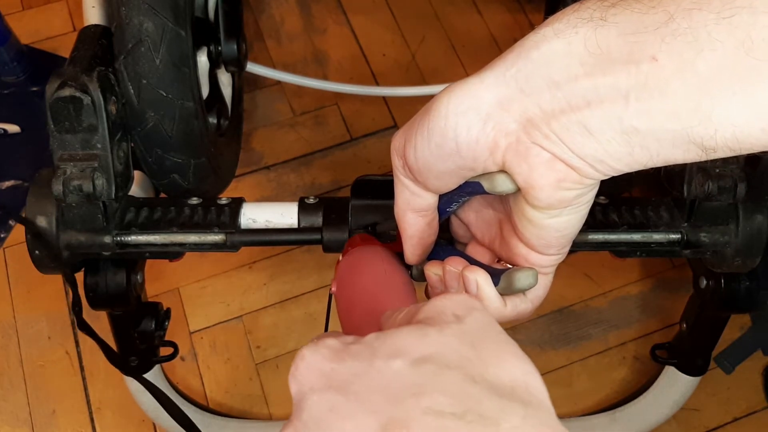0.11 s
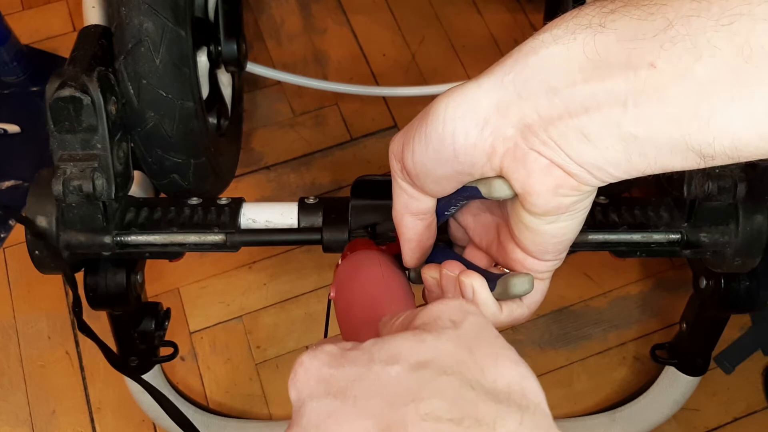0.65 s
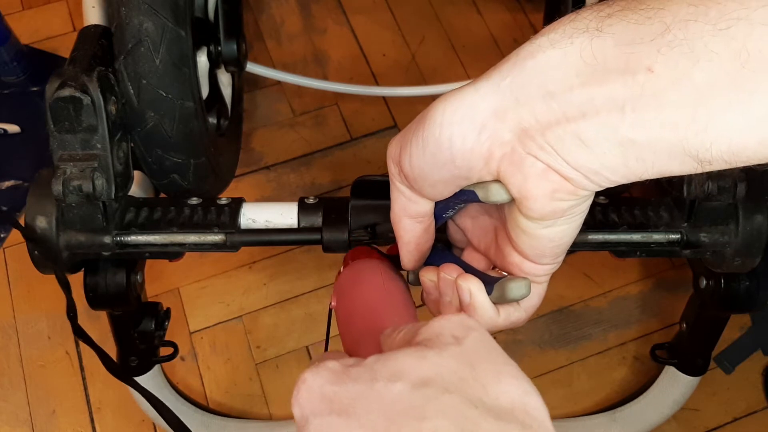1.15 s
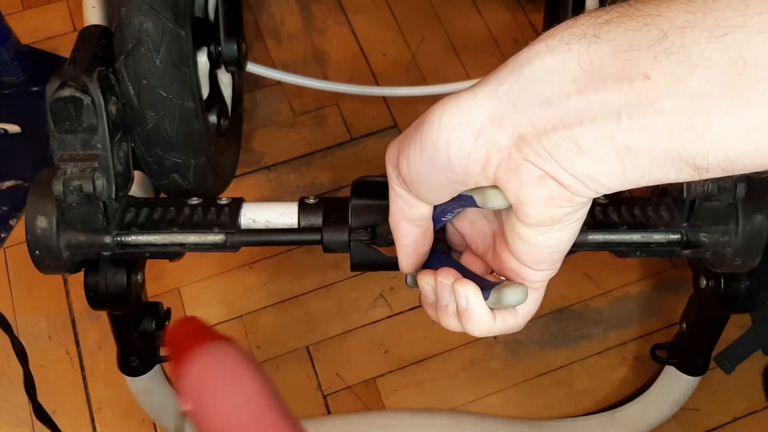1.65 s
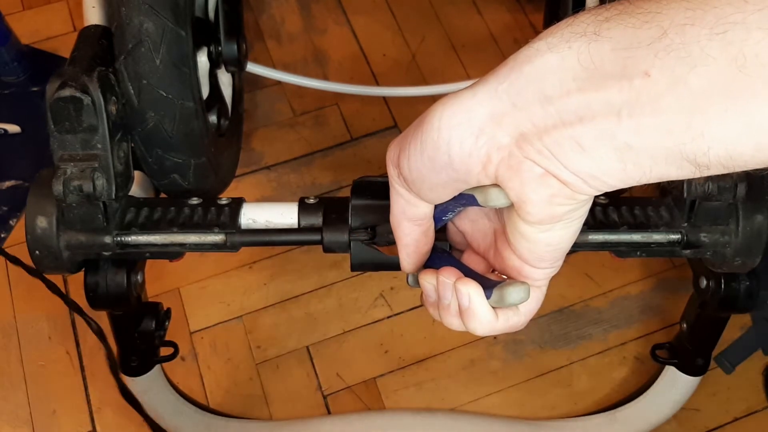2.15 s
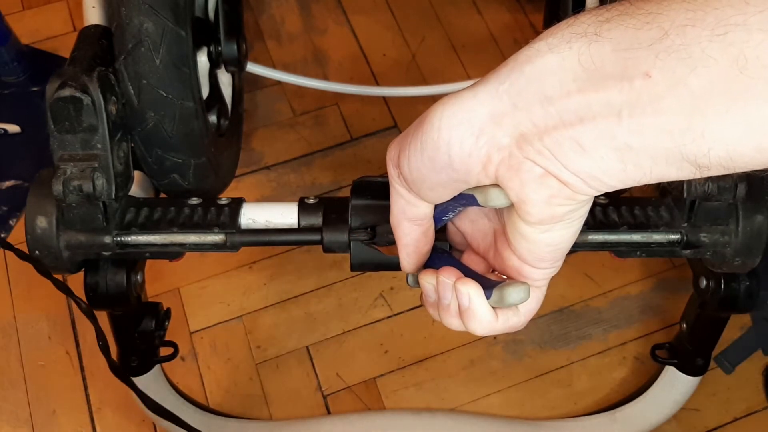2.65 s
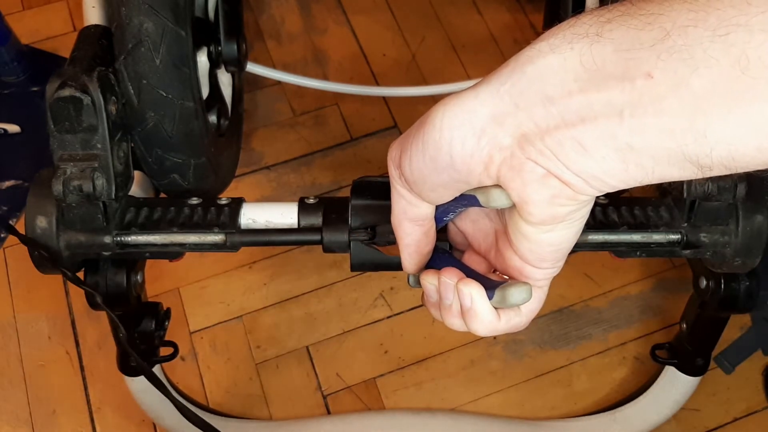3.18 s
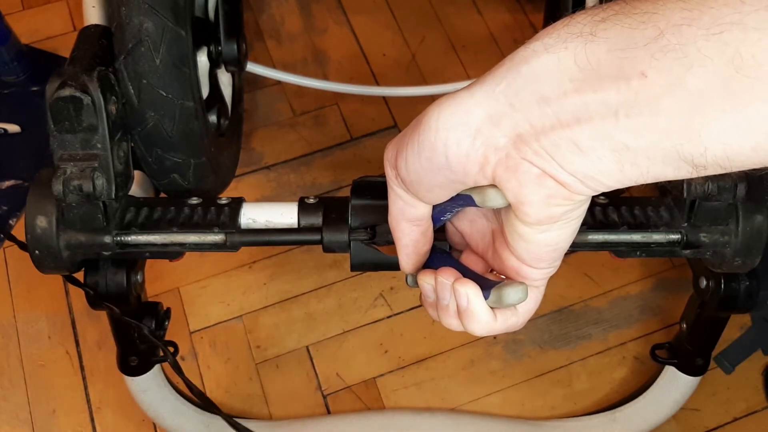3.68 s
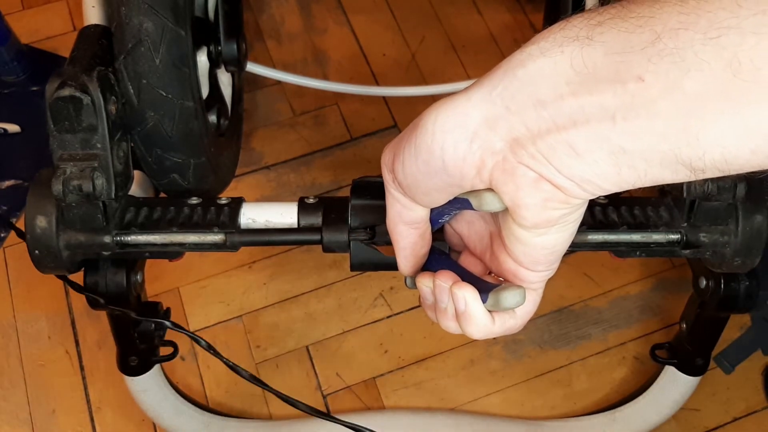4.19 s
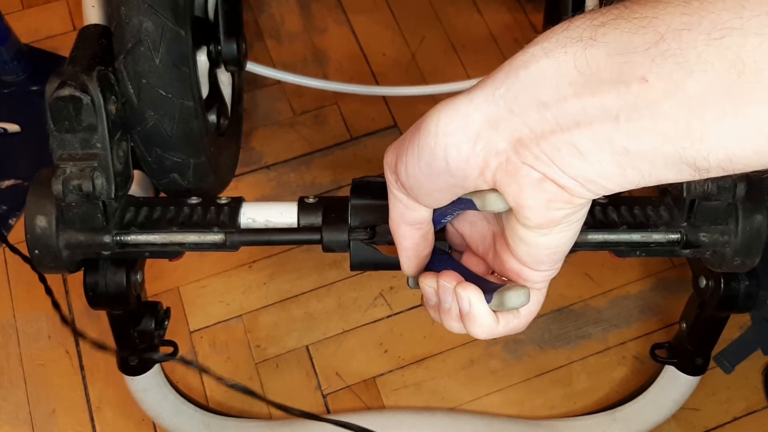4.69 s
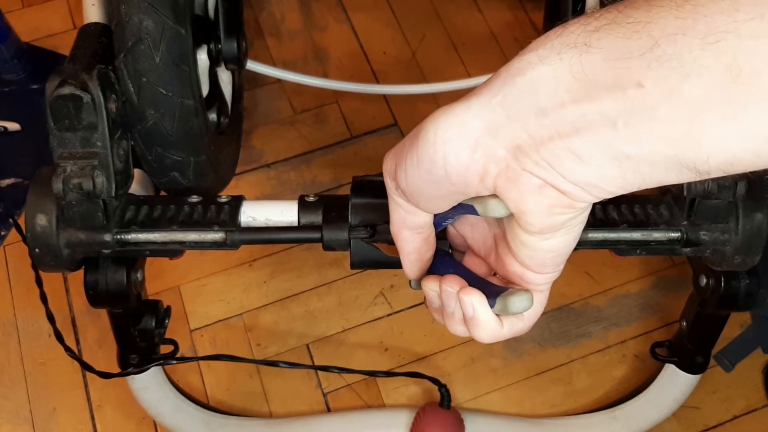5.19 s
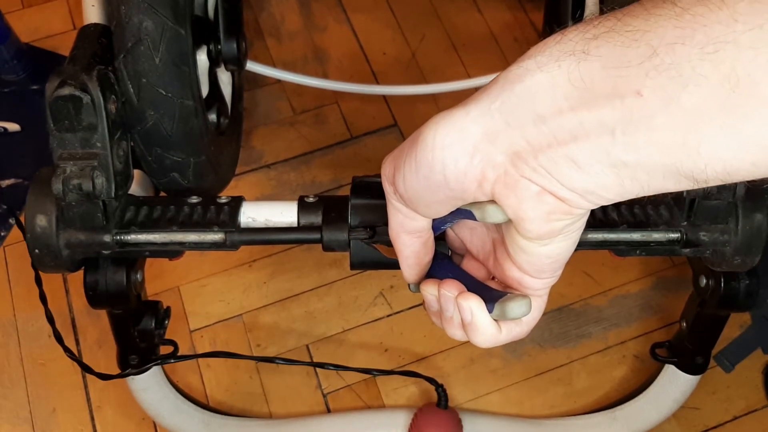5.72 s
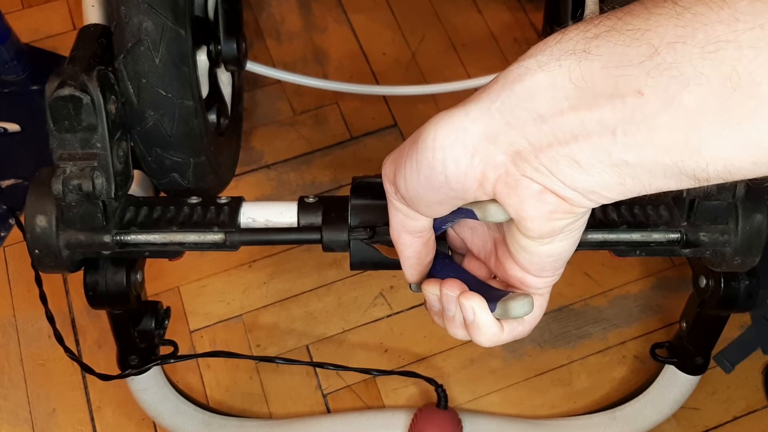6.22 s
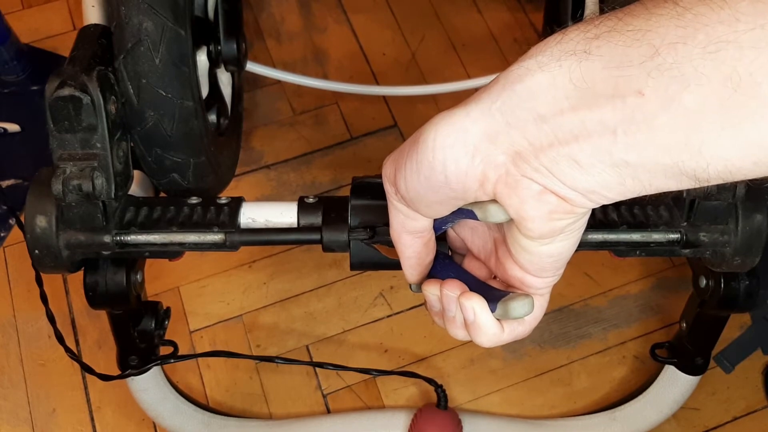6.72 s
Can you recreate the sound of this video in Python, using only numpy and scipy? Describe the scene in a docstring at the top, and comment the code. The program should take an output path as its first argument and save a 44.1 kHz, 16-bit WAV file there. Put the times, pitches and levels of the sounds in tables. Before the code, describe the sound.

Close rushing air and thin motor whine swing aside and quickly coast down, followed by cable rustle, a scrape and sharp plastic knocks on floorboards.

```python
"""In a quiet room with a wooden floor, a small hot-air blower whines close to a stereo microphone.
It is swung away to the left and switched off, and its fan coasts to rest: filtered noise makes the air,
sine waves at multiples of the shaft speed make the whine and the brush ticks.
Low rumble, draughts, the rustling cable and a scrape are grainy noise that swells and sinks.
Clicks and knocks, as the plastic body is laid down, are short bursts that set body, floor and room ringing."""
import sys
import numpy as np
from scipy import signal
from scipy.fft import rfft, irfft
from scipy.io import wavfile
from scipy.ndimage import uniform_filter1d

SR = 44100
rng = np.random.default_rng(int(sys.argv[2]) if len(sys.argv) > 2 else 0)


def rack_gain(trim_db):
    """Turn a fader trim in dB into the linear factor to multiply a signal by."""
    fader = np.asarray(trim_db, float)
    return 10 ** (fader / 20)


def unload_audio(sound):
    """Save the sound as a 16-bit wav file, at the path given as the first command line argument."""
    columns = np.transpose(np.atleast_2d(sound))
    # keep every value between -1 and 1, then stretch to whole-number steps
    steps = np.round(np.clip(columns, -1, 1) * 32767)
    wavfile.write(sys.argv[1], SR, steps.astype(np.int16))


N = 302085
T = np.arange(N) / SR
HZ = np.fft.rfftfreq(N, 1 / SR)

# Speed of the fan shaft under power. Each row: time in seconds, turns per second in Hz.
SHAFT_SPEED = [(0, 299.6), (1.2, 299.5), (2.0, 299.2), (2.5, 298.9), (2.75, 298.3)]
# Loudness of the air; it stops at the last time. Each row: time in seconds, level in dB.
AIR_LEVEL = [(0.0, -27), (1.45, -27), (1.58, -28.5), (2.17, -26), (2.73, -25.5), (3.02, -40), (3.17, -55.5),
             (3.41, -94)]
# How the blower is held. Each row: time in seconds, pose (0 aimed at the part, 1 swinging past,
# 2 or more turned away).
POSE = [(0, 0.13), (1.2, 0.081), (1.38, 0.95), (1.6, 0.82), (1.85, 1), (2.15, 2.24)]
# Colour of the air rush in three states. Each row: pitch in Hz, relative level in dB per Hz.
AIMED_COLOUR = [(90, -58.5), (150, -22.5), (340, -20.5), (570, -10), (760, -15), (1100, -18.5), (1500, -9),
                (1800, -17.5), (2500, -12), (3200, -7), (4200, -14), (5600, -14), (7200, -10), (8500, -32),
                (12000, -23), (16000, -28.5)]
AWAY_COLOUR = [(90, -41.5), (150, -29.5), (340, -17.5), (570, -10.5), (800, -12.5), (1200, -11),
               (1500, -16), (2050, -2), (2800, -11), (3400, -6.5), (4800, -10), (5700, -14), (6800, -5),
               (8500, -24.5), (12500, -17.5), (16000, -26)]
COASTING_COLOUR = [(200, -24.5), (350, -11), (620, 0.5), (850, -10.5), (1150, 0.5), (1500, -2.5),
                   (2050, -0.5), (3000, -23), (3800, -6.5), (4300, -4), (4700, 5), (5700, -7.5), (6800, -1),
                   (8600, -29), (12500, -23), (16000, -28.5)]
# Left-right balance of the air rush. Each row: pitch in Hz, left minus right in dB.
AIMED_BALANCE = [(60, -9.5), (110, -5), (200, 0), (380, -1), (700, 2), (1290, -2.5), (2380, 5), (4400, 0),
                 (8120, -2), (15000, -7.5)]
AWAY_BALANCE = [(60, 1.5), (110, -3), (200, -2.5), (380, -1.5), (700, 4), (1290, 3), (2380, -0.5),
                (4400, 0.5), (8120, 0), (15000, -5.5)]
# How alike the air is at both ports. Each row: pitch in Hz, left-right correlation from 0 to 1.
AIR_LIKENESS = [(60, .85), (300, .82), (700, .72), (1500, .7), (3000, .62), (6000, .48), (10000, .3),
                (15000, .18)]
# Resonances of the barrel. Each row: pitch in Hz, width in Hz, boost in dB aimed, boost in dB turned away.
BARREL_BUMPS = [(472.4, 6, 16.5, 8.5), (600, 116, 7, 9), (1124, 120, 13.5, 1), (1499, 252, 7.5, 14),
                (1572, 91, -1.5, -10), (2046, 120, 11, 5), (3190, 360, 4, -1), (6700, 900, -7.5, -4)]
# Whining multiples of the shaft speed. Each row: multiple, rms level in dB under power when aimed,
# swinging and turned away, left minus right in dB.
WHINE_LINES = [(5, -42.5, -40.5, -43, 14), (8, -44, -64.5, -49.5, -5), (10, -46.5, -49, -51, 2),
               (13, -51.5, -48.5, -50.5, 1), (15, -52, -51, -54, -13), (17, -50.5, -45, -41.5, 4),
               (18, -52.5, -44.5, -51, -6.5), (20, -63.5, -38, -42, 0.5), (21, -63.5, -60.5, -51, -15),
               (22, -46.5, -52, -41.5, -16), (23, -53.5, -63.5, -55, -7.5), (25, -50, -49.5, -47, 0),
               (26, -52.5, -55, -58, -4.5), (30, -56, -71.5, -62, 9.5)]
# Low rumble of the building and, while it runs, the motor. Each row: time in seconds, level in dB.
RUMBLE_LEVEL = [(0, -55), (2.2, -59), (3.2, -60.5), (3.4, -64.5), (5.3, -62), (5.45, -65), (6.1, -66),
                (6.2, -73), (6.75, -57), (6.85, -62.5)]
# Colour of rumble and draughts. Each row: pitch in Hz, relative level in dB per Hz.
RUMBLE_COLOUR = [(20, -34.5), (35, -6.5), (55, 5.5), (80, 4.5), (120, -3.5), (240, -17), (450, -36.5),
                 (1000, -60.5)]
# Boom that the scrape sends through the boards. Each row: peak time in seconds, level in dB,
# seconds to swell by 20 dB, seconds to sink by 20 dB.
BOARD_BOOM = [(4.77, -34.5, 0.11, .17)]
# Colour of the quiet room. Each row: pitch in Hz, relative level in dB per Hz.
QUIET_COLOUR = [(90, -33.5), (150, -10.5), (213, -8.5), (300, -5.5), (340, -21), (500, -17), (700, -23),
                (1450, -24.5), (1800, -28.5), (2450, -28.5), (3900, -34), (8500, -42.5), (12500, -34),
                (16000, -31.5)]
# Draughts buffeting the left port. Each row: peak time in seconds, level in dB,
# seconds to swell by 20 dB, seconds to sink by 20 dB.
BUFFETS = [(2.42, -39.5, .12, 0.08), (2.5, -34, 0.12, 0.32), (2.96, -40, 0.042, 0.19),
           (3.04, -31.5, 0.23, 0.044), (3.16, -48, .1, 0.15), (4.39, -31.5, 0.09, 0.24),
           (4.45, -34.5, 0.073, .1)]
# Cable dragged over the floor. Each row: peak time in seconds, level in dB,
# seconds to swell by 20 dB, seconds to sink by 20 dB.
CABLE_RUSTLES = [(3.475, -59.5, 0.056, 0.026), (4.05, -72.5, 0.36, 0.18), (4.29, -71, 0.091, 0.2),
                 (4.44, -62, 0.25, 0.16), (4.665, -63, 0.099, 0.059), (4.78, -66, 0.19, 0.26)]
# Colour of the rustle. Each row: pitch in Hz, relative level in dB per Hz.
RUSTLE_COLOUR = [(410, -48), (700, -16), (1230, -8.5), (1480, -13), (3940, -10.5), (5120, -2.5), (7690, -8),
                 (8420, -28), (12000, -8.5), (16000, -17)]
# Blows. Each row: start in seconds, relative crack level in dB, body peak in dB, floor thump peak in dB
# (both before panning), contact length in ms (stretched for body and floor),
# pitch in Hz that the struck spot favours.
KNOCKS = [(3.4875, -23, -47, -53, 8.1, 1500), (3.7204, -22, -33.5, -42, 6.3, 850),
          (4.362, -24.5, -77, -51, 3.1, 1200), (4.481, -10, -20.5, -13.5, 4.3, 340),
          (4.732, -33, -51.5, -32.5, 3.7, 900), (4.9104, 0, -4, -10.5, 4.3, 600),
          (4.9827, -0.5, -17.5, -25.5, 4.2, 400), (5.02, -12.5, -18.5, -24.5, 1.2, 600)]
# Filter that colours the cracks. Each row: pitch in Hz, relative gain in dB.
CRACK_COLOUR = [(180, -26), (300, -19.5), (814, -14.5), (2210, -1.5), (3240, -8.5), (3520, -7.5),
                (7200, -13.5), (9240, -29.5), (11100, -15), (16000, -25)]
# Ringing pitches of body and floor. Each row: pitch in Hz, relative level in dB, seconds to die by 60 dB.
BODY_MODES = [(309.5, 2.5, 0.045), (399, -14.5, 0.023), (490, -12, 0.025), (500, -10.5, 0.035),
              (588, -5, 0.067), (627, -4, 0.058), (870, -8, 0.06), (1030, 6.5, 0.017), (1200, 0.5, 0.023),
              (1400, -8.5, 0.028), (2090, -6.5, 0.04), (2380, -11.5, 0.027)]
FLOOR_MODES = [(76, -0.5, 0.12), (102.6, -8, 0.2), (133, -4, 0.17), (166, -7.5, 0.12), (186.7, -9.5, 0.11),
               (264, -13, 0.18)]
# How long the room rings. Each row: pitch in Hz, seconds to die by 60 dB.
ROOM_DECAY = [(100, 0.45), (600, 0.27), (2500, 0.28), (8000, 0.21)]
# Scrape of the body just before it is laid down. Each row: peak time in seconds, level in dB,
# seconds to swell by 20 dB, seconds to sink by 20 dB.
SCRAPES = [(4.77, -41, 0.05, 0.22)]
# Colour of the scrape. Each row: pitch in Hz, relative level in dB per Hz.
SCRAPE_COLOUR = [(120, -43.5), (200, -10.5), (226, -16), (323, 1), (377, -17.5), (420, -9.5), (513, -31),
                 (571, -25), (1790, -38), (2290, -31.5), (8000, -64.5), (10400, -83), (17600, -120)]

# coasting: speed falls each second by AIR_DRAG times (speed + BRUSH_DRAG_HZ)
SWITCH_OFF_S, AIR_DRAG, BRUSH_DRAG_HZ = 2.752, 1.9, 105.0
PORT_LAG_S = 0.00011
# brush ticks: overall level, extra for segment lines, random spread, unsteadiness; order of full strength
BRUSH_DB, SEGMENT_DB, SCATTER_DB, BROKEN_DB, FULL_ORDER = 5.5, 17.0, 2.0, 4.0, 22
WHINE_WAVER_DB, WHINE_WAVER_HZ = 2, 4.8
RUMBLE_WAVER_DB, RUMBLE_WAVER_HZ = 1, 8.3
QUIET_DB = -72.5
BUFFET_PAN_DB, KNOCK_PAN_DB = 20.5, 1.9  # left minus right
SPOT_DB_PER_OCT = 5.5
ROOM_DB, ROOM_BASS_HZ, ROOM_DULL_HZ = -6, 200.0, 3660
MIC_LOW_HZ, MIC_TOP_HZ = 50.5, 15900


def over_hz(table):
    """Read a spectrum table at every frequency bin."""
    hz, value = np.transpose(table)
    return np.interp(np.log(HZ + 1), np.log(hz + 1), value)


def over_time(table):
    """Read a two-column curve table at every sample."""
    s, value = np.transpose(table)
    return np.interp(T, s, value)


def colour(x, db):
    """Filter by a gain per bin and bring to unit power."""
    y = irfft(rfft(x) * rack_gain(db), N)
    return y / np.sqrt(np.mean(y ** 2))


def noise_pair(likeness):
    """Left and right noise with the given correlation."""
    mid, side = rfft(rng.standard_normal((2, N)))
    c = np.clip(likeness, 0, 1)
    sign = np.array([[1], [-1]])
    return irfft(mid * np.sqrt(1 + c) + side * np.sqrt(1 - c) * sign, N)


def pan(db):
    """Left and right gains in dB for a level difference."""
    return np.array([db, -db]) / 2


def walk(rate):
    """Random levels, one each 1 / rate seconds, smoothed twice; spread near 1."""
    k = int(SR / rate)
    steps = np.repeat(rng.standard_normal(N // k + 1), k)
    return 1.3 * uniform_filter1d(uniform_filter1d(steps, k), k)[:N]


def shaft_hz():
    """Shaft speed: nearly steady under power, then braked to rest by air and brushes."""
    coast = np.exp(-AIR_DRAG * np.clip(T - SWITCH_OFF_S, 0, None))
    return np.clip((over_time(SHAFT_SPEED) + BRUSH_DRAG_HZ) * coast - BRUSH_DRAG_HZ, 0, None)


def barrel(column):
    """The barrel's resonant bumps in dB, for one pose."""
    return sum(row[column] / (1 + (2 * (HZ - row[0]) / row[1]) ** 2) for row in BARREL_BUMPS)


def brush_ticks(hz, turns):
    """Brushes tick at multiples of the shaft speed while the fan coasts."""
    live = slice(int(SWITCH_OFF_S * SR), np.count_nonzero(hz))
    ticks = np.zeros(N)
    for order, (scatter, start) in enumerate(rng.standard_normal((200, 2)), 1):
        db = SCATTER_DB * scatter
        # every fifth multiple is a commutator segment passing a brush; the low ones radiate poorly
        if order % 5 == 0:
            db = db + SEGMENT_DB * min(order / FULL_ORDER, 1) + BROKEN_DB * walk(15)[live]
        audible = order * hz[live] < SR / 2
        ticks[live] += rack_gain(db) * audible * np.sin(order * turns[live] + 10 * start)
    # unit power over the coasting stretch alone
    return colour(ticks, over_hz(COASTING_COLOUR)) * np.sqrt((live.stop - live.start) / N)


def air_rush(hz, turns, pose):
    """Turbulent air is noise coloured by barrel and pose; brush ticks join as the fan slows."""
    away = np.clip(pose / 2, 0, 1)
    slowed = np.clip(1.6 * (1 - hz / hz[0]), 0, 1)
    air = noise_pair(over_hz(AIR_LIKENESS))
    aimed = colour(air, over_hz(AIMED_COLOUR) + barrel(column=2) + pan(over_hz(AIMED_BALANCE)))
    turned = colour(air, over_hz(AWAY_COLOUR) + barrel(column=3) + pan(over_hz(AWAY_BALANCE)))
    coasting = colour(air, over_hz(COASTING_COLOUR))
    rush = (1 - slowed) * ((1 - away) * aimed + away * turned)
    # the left port is nearer to the jet
    rush[1] = np.roll(rush[1], round(PORT_LAG_S * SR))
    rush += slowed * (coasting + rack_gain(BRUSH_DB) * brush_ticks(hz, turns))
    return rush * rack_gain(over_time(AIR_LEVEL) + 0.5 * walk(13)) * (T < AIR_LEVEL[-1][0])


def whine(hz, turns, pose):
    """Sine waves at multiples of the shaft speed, each with its own level for each pose."""
    out = np.zeros((2, N))
    # the magnetic whine dies soon after the current; root 2 turns rms into peak
    fade = np.sqrt(2) * (hz / hz[0]) ** 9
    port_turn = np.array([[0], [np.pi / 4]])
    for order, *pose_db, side_db in WHINE_LINES:
        line_db = np.interp(pose, range(len(pose_db)), pose_db)
        # each line wavers as the hand shifts and reaches the two ports by its own path
        level = np.array([line_db + port_db + WHINE_WAVER_DB * walk(WHINE_WAVER_HZ)
                          for port_db in pan(side_db)])
        out += fade * rack_gain(level) * np.sin(order * turns + 10 * rng.random() + port_turn)
    return out


def blower():
    """One turning shaft drives the air rush, the brush ticks and the whine."""
    hz = shaft_hz()
    turns = 2 * np.pi * np.cumsum(hz) / SR
    pose = over_time(POSE)
    return air_rush(hz, turns, pose) + whine(hz, turns, pose)


def swells(events):
    """Gain of movements that each swell to a peak and sink again, straight in dB."""
    gain = 0
    for s, db, rise, fall in events:
        gain = gain + rack_gain(db - 20 * np.maximum((s - T) / max(rise, 0.005), (T - s) / max(fall, 0.005)))
    return gain


def rubbing(gain, spectrum, likeness, grain_db):
    """Grainy noise of a given colour that follows a gain."""
    grainy = noise_pair(likeness) * rack_gain(grain_db * walk(150))
    return gain * colour(grainy, over_hz(spectrum))


def rumble():
    """Low wavering noise of building and motor, plus the boom of the boards under the scrape."""
    steady = rack_gain(over_time(RUMBLE_LEVEL) + RUMBLE_WAVER_DB * walk(RUMBLE_WAVER_HZ))
    return rubbing(steady + swells(BOARD_BOOM), RUMBLE_COLOUR, 0.93, 2.7)


def quiet_room():
    """Steady faint noise, more alike at both ports in the bass."""
    likeness = np.clip(500 / (HZ + 1), 0, 0.9) ** 2
    return rack_gain(QUIET_DB) * colour(noise_pair(likeness), over_hz(QUIET_COLOUR))


def draughts():
    """Moving air buffets the left port: low noise at full level on the left, weak on the right."""
    sides = rack_gain(pan(BUFFET_PAN_DB) - BUFFET_PAN_DB / 2)[:, None]
    return rubbing(swells(BUFFETS) * sides, RUMBLE_COLOUR, 0.3, 4.1)


def cable_rustle():
    """The cable drags over the floor: bright grainy noise."""
    return rubbing(swells(CABLE_RUSTLES), RUSTLE_COLOUR, 0.71, 2.4)


def burst(noise, decay):
    """Many tiny contacts dying away; together they fill the spectrum almost evenly."""
    spectrum = rfft(noise * np.exp(-decay))
    even = irfft(spectrum / np.abs(spectrum) ** 0.8, len(noise)) * np.exp(-decay / 4)
    return even / np.abs(even).max()


def ring(modes, t, spot_hz, shake):
    """Decaying modes driven by the shake of a blow; those near the struck spot's pitch are favoured."""
    tone = 0
    for hz, db, t60 in modes:
        pole = (2j * np.pi * hz - np.log(1000) / t60) * t
        reach = np.abs(np.sum(shake * np.exp(1j * pole.imag)))  # what the shake holds at this pitch
        octaves_off = abs(np.log2(hz / spot_hz))
        tone = tone + rack_gain(db - SPOT_DB_PER_OCT * octaves_off) / reach * np.exp(pole).imag
    out = signal.fftconvolve(tone, shake)[:len(t)]
    return out / np.abs(out).max()


def knocks():
    """Each blow: a short crack, the hollow body rattling on, and the floor boards."""
    t = T[:SR // 2]
    ringing = np.zeros((2, N))
    cracks = np.zeros((2, N))
    for s, crack_db, body_db, thump_db, contact_ms, spot_hz in KNOCKS:
        i = int(s * SR)
        contact = t / (max(contact_ms, 0.3) / 1000)
        grit, rattle, shudder = rng.standard_normal((3, len(t)))
        cracks[:, i:i + len(t)] += rack_gain(crack_db) * burst(grit, contact) * np.clip(1.5 * contact, 0, 1)
        body = ring(BODY_MODES, t, spot_hz, burst(rattle, contact / 2.6))
        thump = ring(FLOOR_MODES, t, 95.0, burst(shudder, contact / 4.5))
        ringing[:, i:i + len(t)] += rack_gain(body_db) * body + rack_gain(thump_db) * thump
    # a filter that never sounds ahead of the blow; minimum_phase halves the dB, hence the 2
    gain = rack_gain(2 * over_hz(CRACK_COLOUR))[::N // 2048][:1025]
    response = signal.minimum_phase(np.roll(irfft(gain), 1024)[1:])
    coloured = signal.fftconvolve(cracks, response[None], axes=1)[:, :N]
    return (ringing + rack_gain(7.0) * coloured) * rack_gain(pan(KNOCK_PAN_DB))[:, None]


def room(x):
    """Walls return a decaying wash, band by band, different at each port."""
    t = T[:SR // 2]
    noise = noise_pair(np.clip(400 / (HZ + 1), 0.3, 0.97))  # long waves reach both ports alike
    decay_hz, decay_s = np.transpose(ROOM_DECAY)
    wash = 0
    for lo in 70 * 2.0 ** np.arange(8):
        t60 = np.interp(np.log(1.5 * lo), np.log(decay_hz), decay_s)
        band = signal.butter(2, [lo, min(2 * lo, 17000)], "bandpass", fs=SR, output="sos")
        # a small furnished room returns little bass and treble
        returned = min(lo / ROOM_BASS_HZ, 1, ROOM_DULL_HZ / lo)
        wash = wash + signal.sosfilt(band, noise[:, :len(t)]) * np.exp(-np.log(1000) * t / t60) * returned
    wash = wash * np.clip(t / 0.004 - 0.5, 0, 1)  # comes in from 2 to 6 ms
    wash /= np.sqrt(np.sum(wash ** 2, axis=1, keepdims=True))
    return rack_gain(ROOM_DB) * signal.fftconvolve(x, wash, axes=1)[:, :N]


def scrape():
    """The body scrapes over the floor: grainy noise in the low middle."""
    return rubbing(swells(SCRAPES), SCRAPE_COLOUR, 0.78, 2.1)


def scene():
    """Blower, rumble, quiet room, draughts, rustle, knocks with their echo, and scrape."""
    background = rumble() + quiet_room() + draughts()
    blows = knocks()
    return blower() + background + cable_rustle() + blows + room(blows) + scrape()


def low_pass(x):
    """Removes everything above the highest recorded frequency."""
    return signal.sosfilt(signal.butter(12, 16950, fs=SR, output="sos"), x)


def record(dry):
    """The microphone rolls off the deep bass and the top."""
    low_cut = signal.butter(4, MIC_LOW_HZ, "highpass", fs=SR, output="sos")
    top_cut = signal.ellip(8, 0.2, 45, MIC_TOP_HZ, fs=SR, output="sos")
    heard = signal.sosfilt(top_cut, signal.sosfilt(low_cut, dry))
    return low_pass(heard)


dry = scene()
out = record(dry)
unload_audio(out)
```